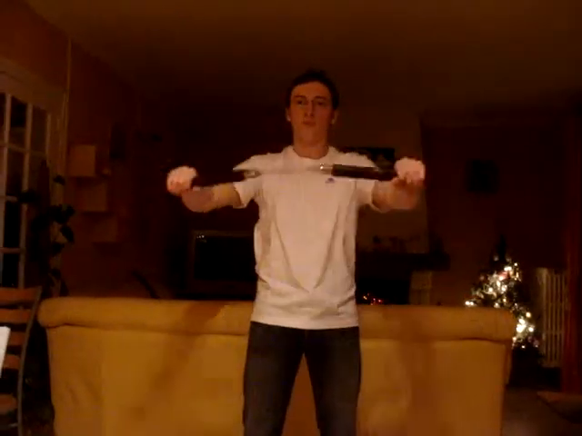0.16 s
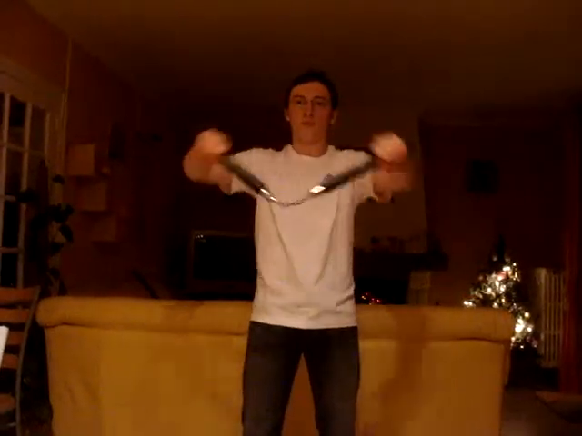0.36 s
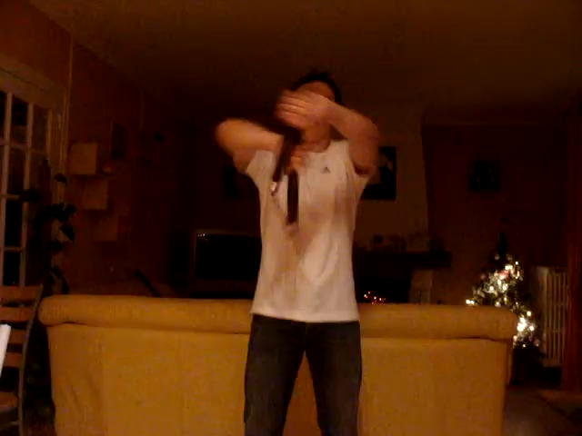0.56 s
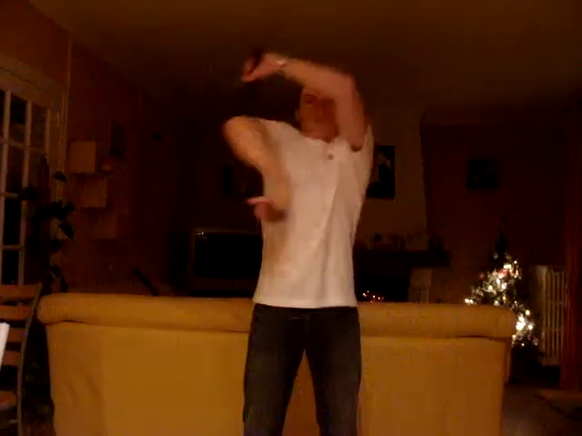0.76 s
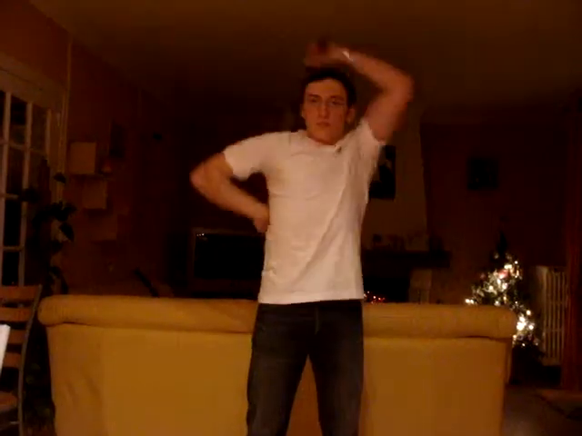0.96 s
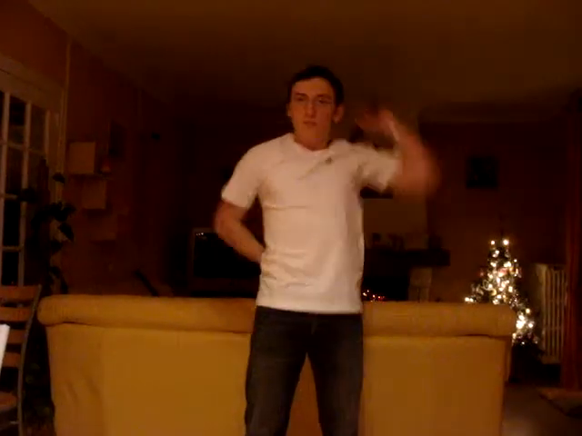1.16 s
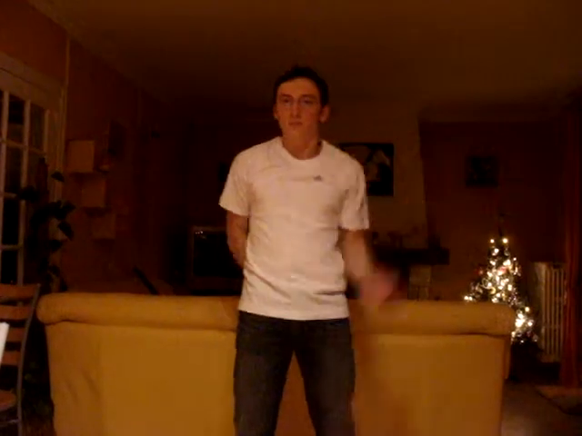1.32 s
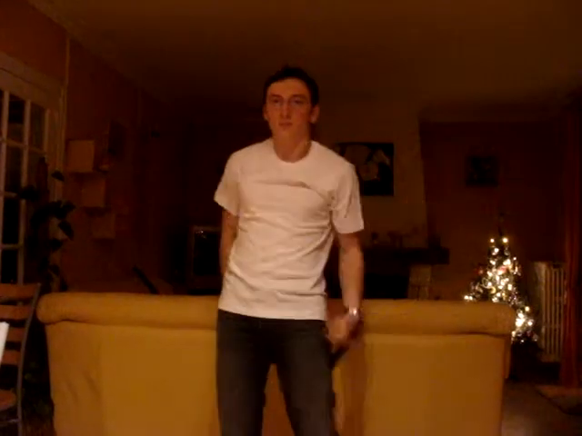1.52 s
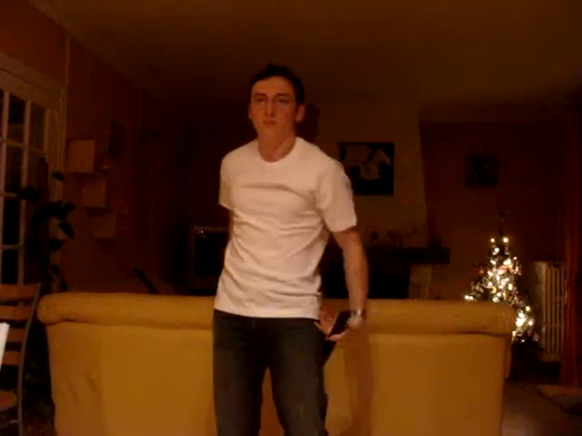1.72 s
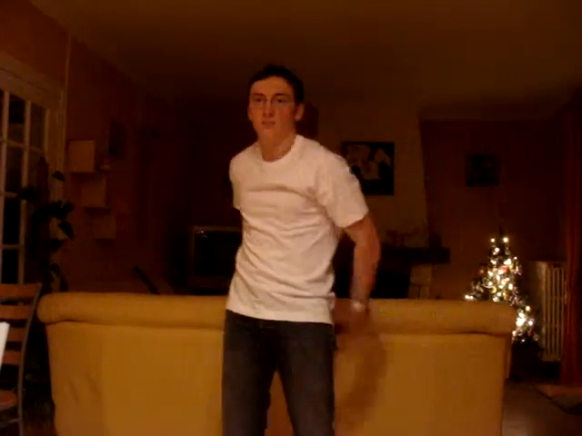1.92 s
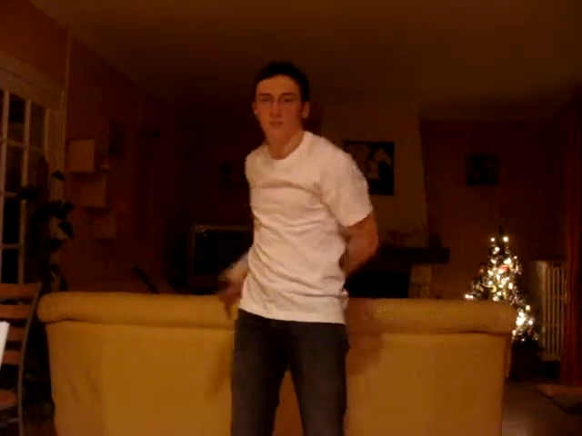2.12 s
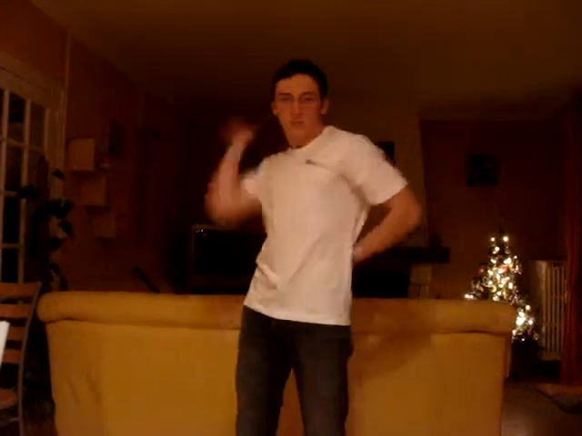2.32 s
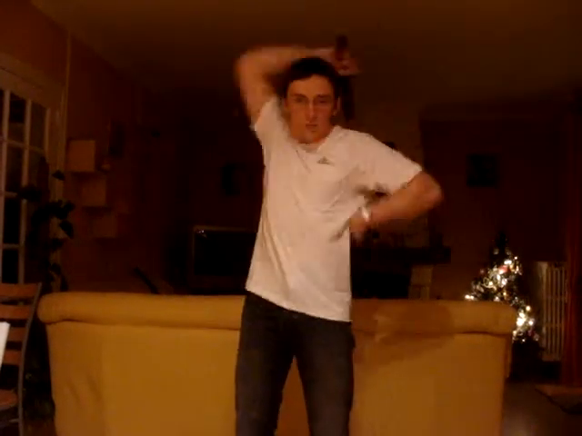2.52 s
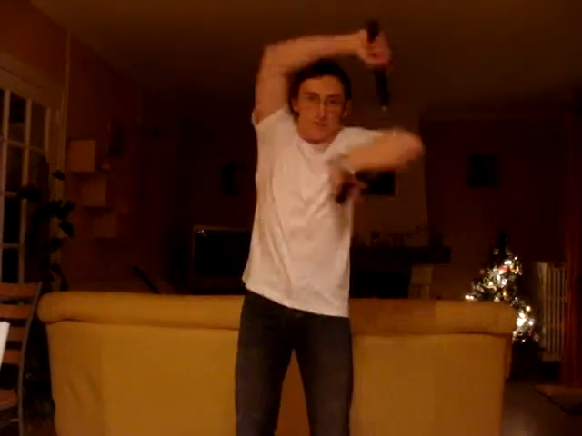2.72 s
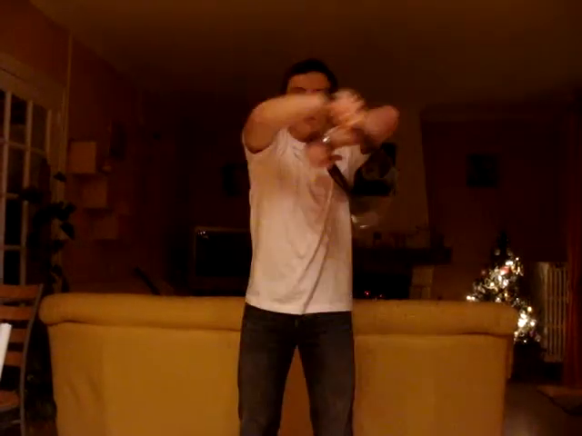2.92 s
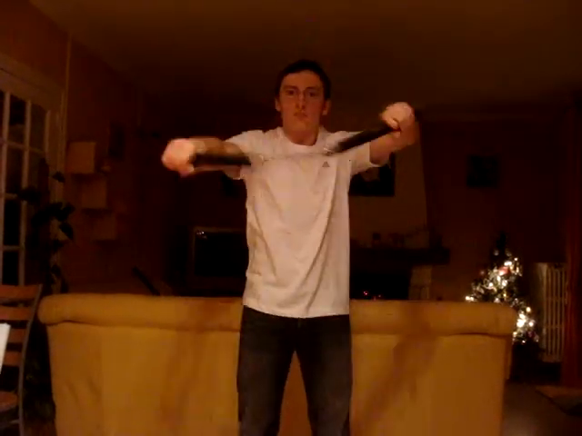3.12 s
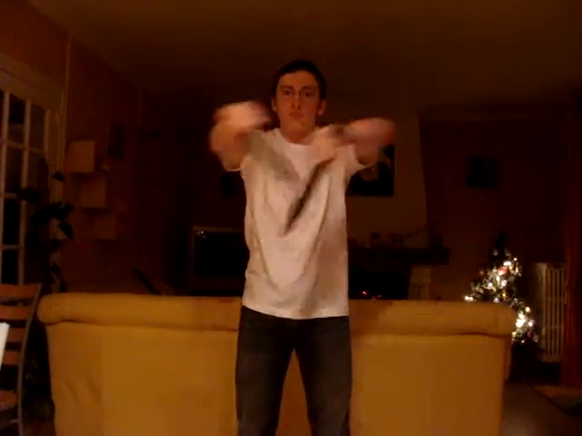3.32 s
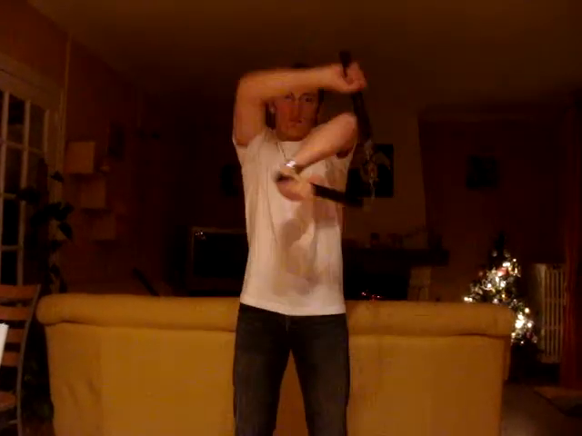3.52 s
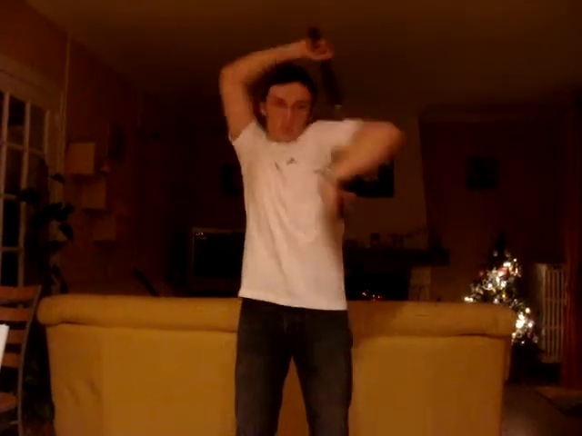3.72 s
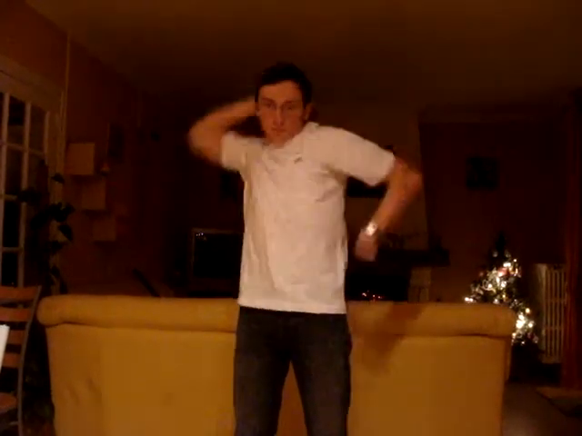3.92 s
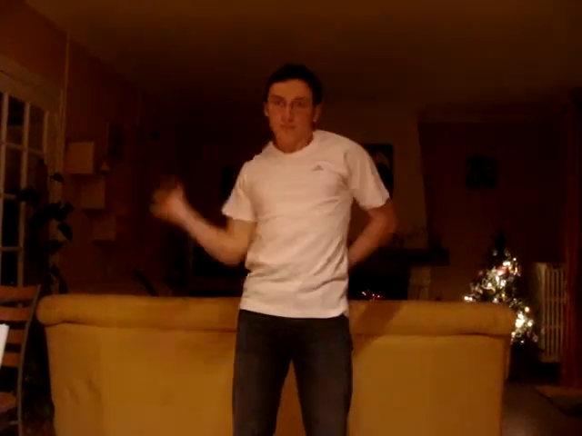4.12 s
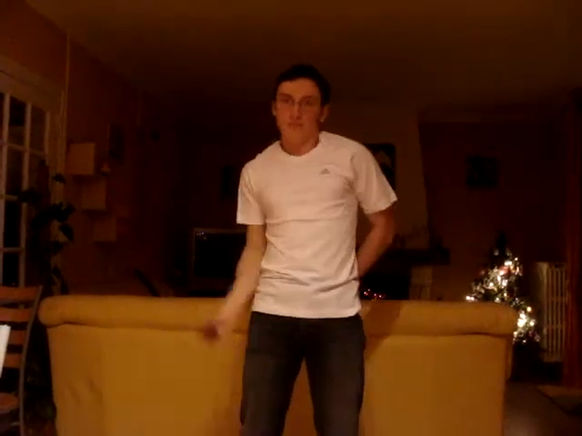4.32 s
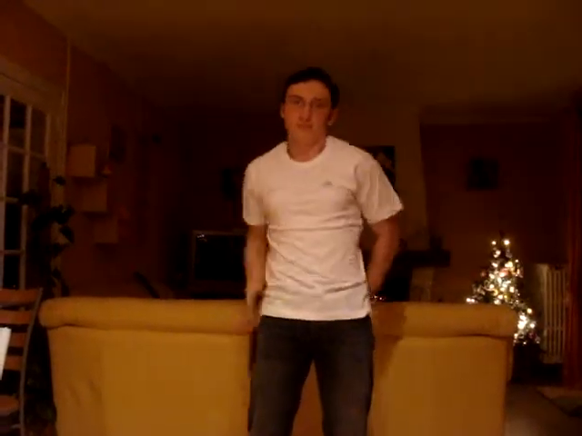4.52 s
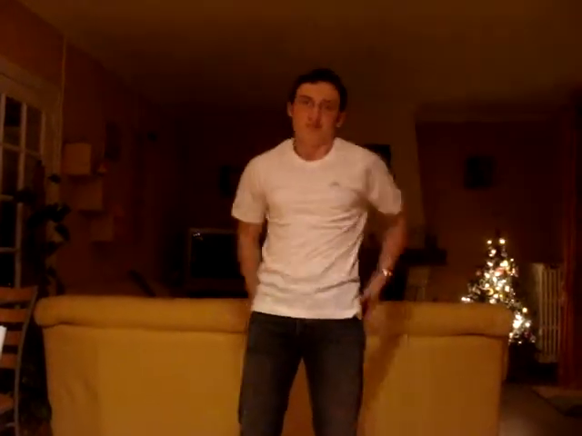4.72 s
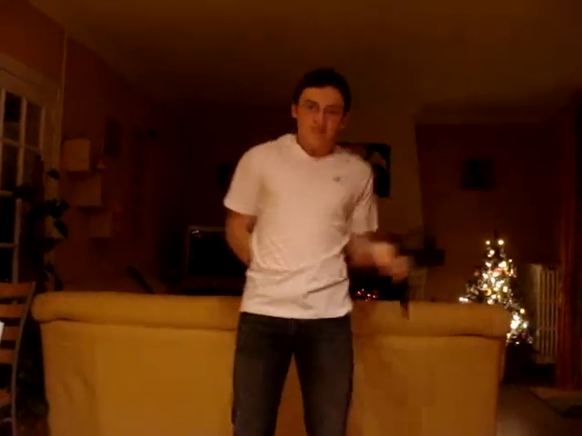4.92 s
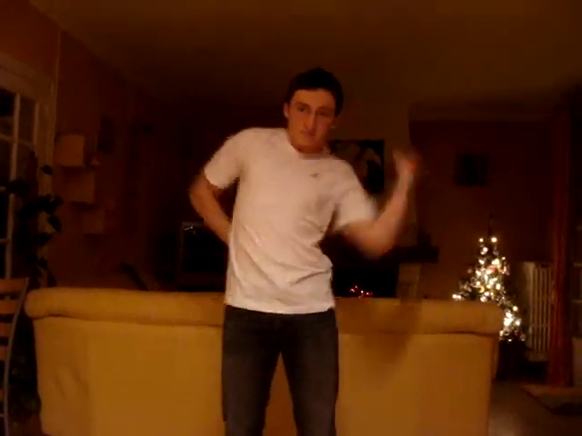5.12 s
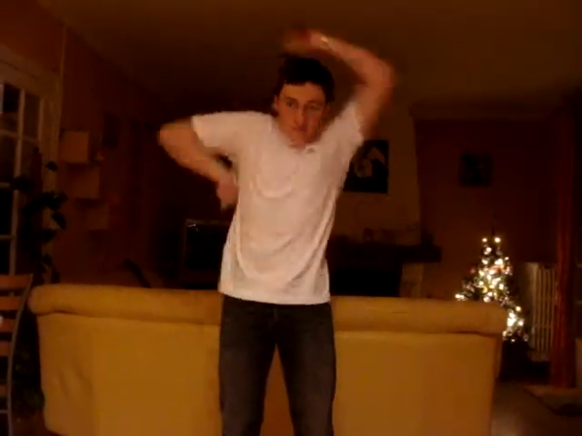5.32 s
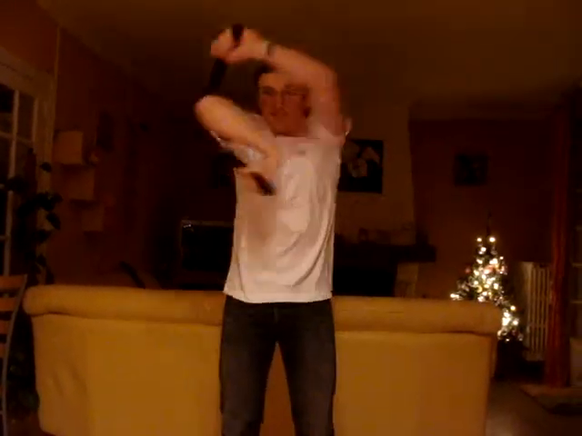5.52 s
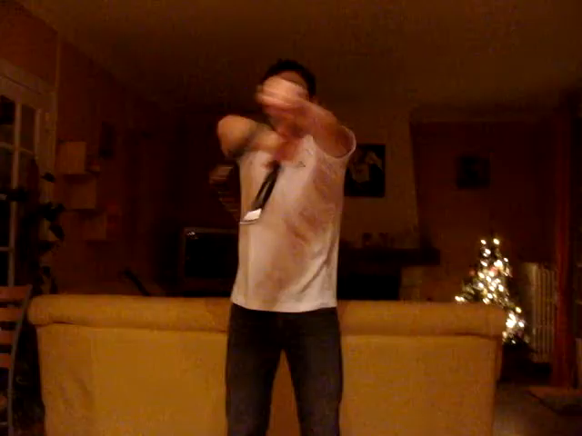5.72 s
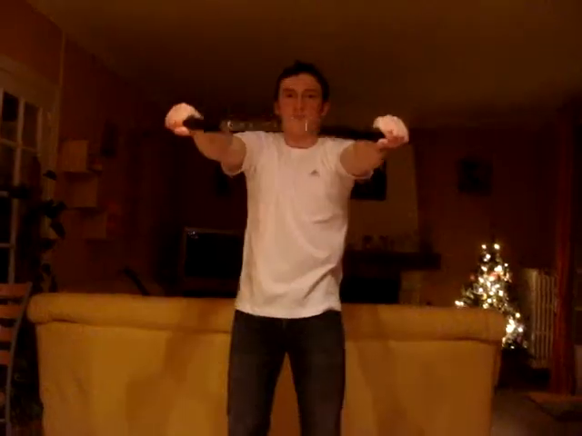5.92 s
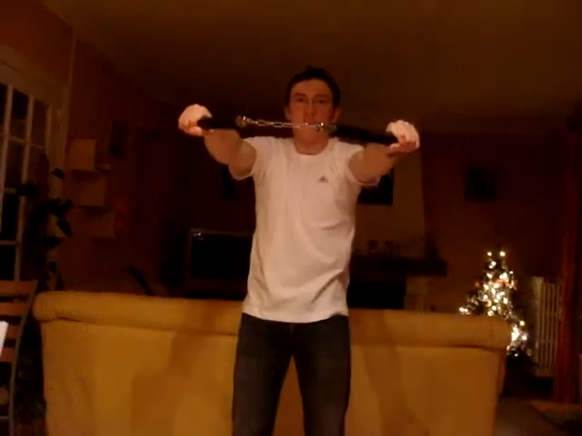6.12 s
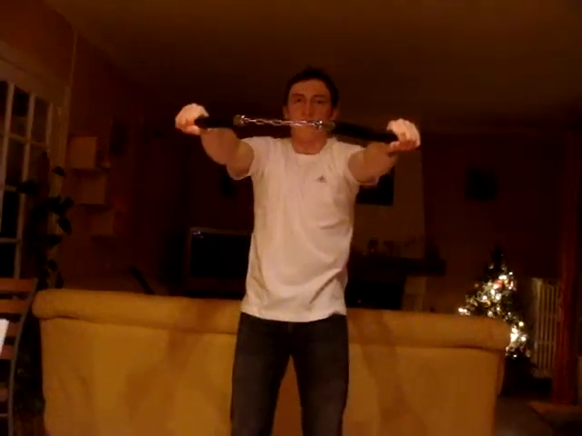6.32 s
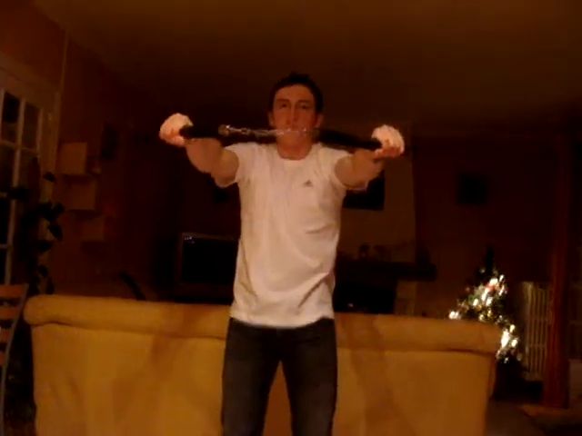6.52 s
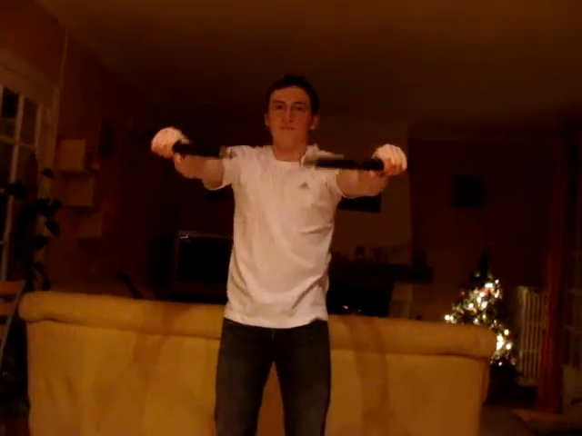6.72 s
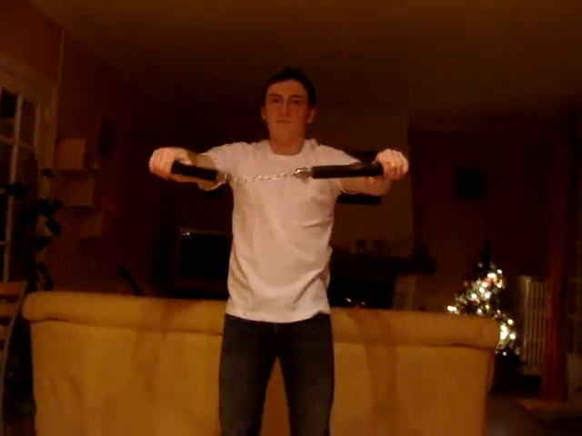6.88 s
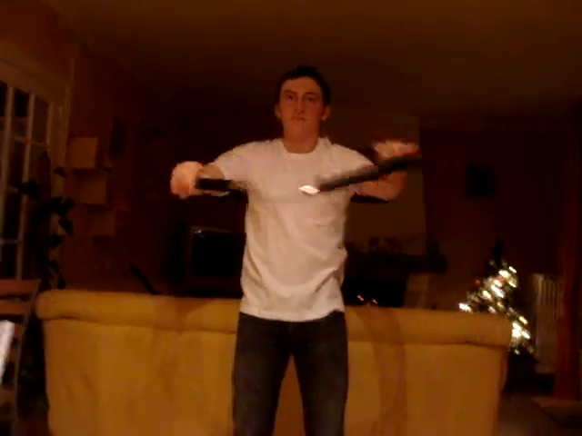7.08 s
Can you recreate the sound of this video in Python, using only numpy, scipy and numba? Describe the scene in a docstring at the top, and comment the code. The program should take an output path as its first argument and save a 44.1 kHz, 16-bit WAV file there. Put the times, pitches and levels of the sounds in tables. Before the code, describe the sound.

In a living room with short reverberation, a small microphone hears quick whooshes and sharp wooden knocks coloured by short metallic link rattles. Softer hollow body slaps and rubbing cloth fill the gaps. Late on, something tiny snaps, scrapes and snaps again very close, dry and loud. One more clack is followed by a pause and a strong blow with rumbling floor resonance, then small chain ticks over steady dull hiss and thin whine.

```python
"""A tug on a short chain, then swishes, rattle and rustle: wooden nunchaku swung in a living room.
Catches, slaps and chain jerks are clusters of random contacts through wood, steel and body filters.
Swishes are gliding band-passed noise; air, rolling chain and clothes are noise and grains that follow the effort.
Echoes and decaying noise bands draw these out; a heavy thud of ringing modes and noise comes near the end.
Two dry clicks with a scrape between them sit at the microphone; floor bumps, hiss and whine lie beneath."""
import sys
import numpy as np
from scipy import signal
from scipy.fft import rfft, irfft
from scipy.io import wavfile
from numba import njit

SR = 44100
rng = np.random.default_rng(int(sys.argv[2]) if len(sys.argv) > 2 else 0)


def pcm_store(signal):
    """Save signal as 16-bit PCM."""
    levels = np.round(np.clip(np.atleast_2d(signal), -1, 1) * 32767)
    wavfile.write(sys.argv[1], SR, levels.astype(np.int16).T)


N = 315315
TIME_S = np.arange(N) / SR


def undb(db):
    """Amplitude ratio of a level in dB."""
    return 10 ** (np.asarray(db) / 20)


def unit(x):
    """Scale to an energy of one."""
    return x / np.sqrt(np.sum(x ** 2) + 1e-18)


def level(x, db):
    """Scale to an rms level."""
    return unit(x) * np.sqrt(len(x)) * undb(db)


def add(out, start_s, x):
    """Mix x into out from start_s on."""
    i = max(int(start_s * SR), 0)
    out[i:i + len(x)] += x[:N - i]


def on_log(hz, points):
    """Read (Hz, value) points on a log-frequency axis."""
    f, value = np.transpose(points)
    return np.interp(np.log(np.maximum(hz, 1)), np.log(f), value)


def colour(x, spectrum, size=4096):
    """Causal minimum-phase filter with the given spectrum, from the folded cepstrum."""
    log_gain = np.log(undb(on_log(np.fft.rfftfreq(size, 1 / SR), spectrum)))
    cepstrum = irfft(log_gain)
    cepstrum[1:size // 2] *= 2
    cepstrum[size // 2 + 1:] = 0
    impulse = irfft(np.exp(rfft(cepstrum)))
    return signal.fftconvolve(x, impulse)[:len(x)]


@njit
def svf(x, hz, width):
    """Band-pass whose centre may move every sample; width is relative to the centre."""
    y, b, l = np.empty(len(x)), 0., 0.
    for i in range(len(x)):
        g = np.tan(np.pi * hz[i] / SR)
        v = (b + g * (x[i] - l)) / (1 + g * (g + width))
        b, l, y[i] = 2 * v - b, l + 2 * g * v, width * v
    return y


def noise(count=N):
    """White noise with an rms of one."""
    return rng.standard_normal(count)


def swell(t, half_s):
    """Bell-shaped rise and fall about t = 0."""
    return np.exp(-(t / half_s) ** 2 / 2)


# hard catches, stick home and chain tight; levels before room, steel before its gain:
# t/s, wood level/dB, steel level/dB, body level/dB, clatter length/s, link ring f/Hz
CATCHES = [ (1.311, -26, -51, -54, 0.0046, 2800), (2.247, -23.5, -41, -34.5, .019, 8400),
           (2.675, -33, -53, -48, .0024, 3600), (3.124, -28, -33.5, -37.5, .017, 7360),
           (3.599, -36, -44.5, -40.5, 0.0022, 3080), (3.776, -27, -36.5, -47, 0.0063, 6830),
           (4.440, -29, -35, -42, 0.014, 3240), (4.592, -32, -36.5, -38.5, 0.013, 7660),
           (5.905, -27, -34, -37, .02, 7030), (6.598, -23, -36.5, -34, 0.0026, 3750),
           (6.615, -35.5, -41, -23.5, .01, 6850)]


def catches(dulling=.87, steel_gain_db=3):
    """Each catch knocks the wood, shakes the steel links into a short ring and slaps the hand."""
    out = np.zeros(N)
    for t_s, wood_db, steel_db, body_db, length_s, link_hz in CATCHES:
        # a stick landing on flesh with little steel in the blow loses its treble
        dull_db_per_oct = dulling * max(wood_db - steel_db - 12, 0)
        add(out, t_s, undb(wood_db) * wood_knock(length_s, dull_db_per_oct))
        add(out, t_s, undb(steel_db + steel_gain_db) * link_ring(length_s, link_hz))
        add(out, t_s, undb(body_db) * body_slap(length_s))
    return out


def first_contact(length_s, firm=0.88, firm_s=0.0093):
    """The shorter a clatter, the firmer its first contact."""
    return firm * np.exp(-length_s / firm_s)


def clatter(length_s, first, ring_s, count=16, size=8192):
    """A first contact and others scattered behind it, each a brief crunch; it builds up if the first is not firm."""
    when = (np.arange(count) + rng.random(count)) * 2 / count  # in clatter lengths
    build = np.minimum(3 * first + (when / 0.42) ** 2, 1)
    energy = rng.exponential(size=count) * np.exp(-when / 0.53) * build
    hits = np.zeros(size)
    np.add.at(hits, np.minimum(when * length_s * SR, size - 1).astype(int), energy)
    ringing_energy = signal.lfilter([1], [1, -np.exp(-2 / (ring_s * SR))], hits)
    burst = unit(np.sqrt(ringing_energy) * noise(size))
    burst[0] += first
    return burst


# wood spectrum, relative: f/Hz, level/dB
WOOD_SPECTRUM = [(60, -44), (300, -24.5), (800, -13), (1300, -8.5), (1800, -5), (2300, -3.5), (2800, -1),
                 (3400, -5), (4200, -9.5), (6000, -18), (10000, -62)]


def wood_knock(length_s, dull_db_per_oct=0, ring_s=0.0015):
    """Clatter of the sticks, losing dull_db_per_oct of treble above 2900 Hz."""
    spectrum = [(hz, db - dull_db_per_oct * max(np.log2(hz / 2900), 0)) for hz, db in WOOD_SPECTRUM]
    return unit(colour(clatter(length_s, first_contact(length_s), ring_s), spectrum))


# steel spectrum, relative: f/Hz, level/dB
STEEL_SPECTRUM = [(1500, -28.5), (3000, 3.5), (4000, 8.5), (5000, 9), (6200, 2.5), (7600, 2.5), (9000, 3.5),
                  (10200, -2.5)]


def link_ring(length_s, hz, ring_db=-3, width=0.076, firm_share=0.34, ring_s=0.00098):
    """Clatter of the steel links, with a short ring at hz."""
    contacts = clatter(length_s, firm_share * first_contact(length_s), ring_s)
    links = colour(contacts, STEEL_SPECTRUM)
    ring = svf(links, np.full(len(links), float(hz)), width)
    return unit(unit(links) + undb(ring_db) * unit(ring))


# soft body spectrum, relative: f/Hz, level/dB
BODY_SPECTRUM = [(40, -43.5), (90, -32.5), (140, -6.5), (250, -2.5), (430, -1), (700, 3), (1200, -7.5),
                 (2200, -1.5), (6000, -58)]


def body_slap(length_s, ring_s=0.006):
    """The dull smack of hand or body."""
    return unit(colour(clatter(length_s, first_contact(length_s), ring_s), BODY_SPECTRUM))


# soft landings on the clothed body, before room: t/s, body level/dB, wood level/dB, clatter length/s
SLAPS = [(1.076, -42.5, -38.5, 0.032), (1.456, -37.5, -38.5, .01), (1.574, -50, -44, 0.013),
         (1.835, -45, -43, 0.012), (2.447, -43.5, -31, 0.034), (2.558, -51, -38, 0.017),
         (3.478, -44, -36.5, 0.012), (3.738, -42.5, -39.5, 0.0036), (4.862, -39, -33.5, .028)]


def slaps(thump_hz=443, thump_width=.6, thump_db=-2.5, dull_db_per_oct=-1):
    """The stick lands on the body with a slack chain: a hollow thump and a knock."""
    out = np.zeros(N)
    for t_s, body_db, wood_db, length_s in SLAPS:
        smack = body_slap(length_s)
        hollow = unit(svf(smack, np.full(len(smack), float(thump_hz)), thump_width))
        add(out, t_s, undb(body_db) * unit(smack + undb(thump_db) * hollow))
        # negative dulling: treble rises 1 dB per octave
        add(out, t_s, undb(wood_db) * wood_knock(length_s, dull_db_per_oct))
    return out


# chain jerks in mid-air, before room, steel before its gain:
# t/s, stick tug level/dB, link level/dB, clatter length/s
JERKS = [(.004, -46, -57, .011), (0.384, -43.5, -56, 0.0041), (0.465, -43, -43.5, 0.011),
         (0.715, -50, -71, 0.01), (0.83, -45, -60, 0.0095), (1.954, -49, -47.5, 0.022),
         (2.852, -42, -55, .0017), (2.867, -37.5, -62, .022), (2.929, -39, -54, 0.0057),
         (3.102, -39.5, -72, 0.0089), (3.245, -42, -44, .03), (3.347, -41.5, -46.5, 0.012),
         (4.095, -36.5, -46.5, 0.025), (4.733, -35, -40, 0.027), (5.465, -42.5, -55, 0.0012),
         (6.884, -46.5, -50.5, 0.0015), (6.998, -47.5, -58, .02), (7.062, -48.5, -50.5, 0.022)]


def jerks(steel_gain_db=3, link_hz=5800, scatter=0.23):
    """The chain takes up its slack and tugs at the sticks; a different link rings each time."""
    out = np.zeros(N)
    for t_s, wood_db, steel_db, length_s in JERKS:
        hz = link_hz * np.exp(scatter * rng.standard_normal())
        tug = undb(wood_db) * wood_knock(length_s)
        links = undb(steel_db + steel_gain_db) * link_ring(length_s, hz)
        add(out, t_s, tug + links)
    return out


# fast passes of the free stick, before room and speed swell; each peaks 15 ms before t:
# t/s, level/dB, air pitch f/Hz
SWISHES = [(.145, -47.5, 1570), (.915, -42, 1504), (1.214, -39, 1488), (2.48, -40.5, 1210),
           (3.154, -38.5, 1206), (3.455, -38, 1398), (3.768, -42.5, 1063), (3.89, -43.5, 383.6),
           (4.72, -53, 1400)]


def swishes(width=0.99, glide=0.21, ref_half_s=.031, ref_hz=1390, stretch=.8):
    """Eddies shed by the stick: louder and higher as it speeds up; lower passes last longer."""
    out = np.zeros(N)
    for t_s, db, hz in SWISHES:
        half_s = ref_half_s * (ref_hz / hz) ** stretch
        t = np.arange(-3 * half_s, 3 * half_s, 1 / SR)
        speed = swell(t, half_s)
        centre_hz = hz * np.clip(1 - glide + glide * speed, .1, 2)
        rush = svf(noise(len(t)), centre_hz, 2 * width)
        rush = svf(rush, centre_hz, 2 * width)
        add(out, t_s - .015 + t[0], level(rush, db) * speed)
    return out


def grains(rate_hz, spread_db):
    """Random tiny contacts, a few much stronger than the rest."""
    strength = undb(spread_db * np.minimum(rng.exponential(size=N), 4))
    return (rng.random(N) < rate_hz / SR) * strength * rng.choice([-1, 1], N)


# vigour of the swinging, relative: t/s, level/dB
EFFORT = [(0.0, -41), (0.21, -53.5), (0.44, -52), (0.59, -42.5), (1.14, -45), (1.26, -41.5), (2.23, -43.5),
          (2.44, -43.5), (2.84, -46), (4.02, -41), (4.28, -43.5), (4.49, -43.5), (4.61, -39), (4.81, -40.5),
          (4.95, -42), (5.98, -44), (6.16, -60), (6.3, -52)]
# shirt rub as an arm reaches over the shoulder, before room: t/s, level/dB, half length/s
REACHES = [(1.2, -51.5, 0.21), (2.534, -46, 0.16), (2.916, -51, 0.075), (5.224, -49.5, .04),
           (5.404, -44.5, 0.047)]
# stirred air spectrum, relative: f/Hz, level/dB
AIR_SPECTRUM = [(25, -24), (70, -9.5), (130, -10.5), (230, 0), (450, -2.5), (800, -2), (1300, -4.5),
                (2200, 0), (5000, -21.5)]
# rubbing cloth spectrum, relative: f/Hz, level/dB
CLOTH_SPECTRUM = [(800, -14.5), (2500, -18.5), (4500, 5), (6500, 4.5), (8500, 5.5), (10200, -4)]


def motion(air_db=-51, chain_db=-46.5, cloth_db=-54.5, air_law=0.83, chain_law=1.67, cloth_law=1.8):
    """Stirred air, rolling links and rubbing cloth grow as powers of the effort; a reach adds rustle."""
    effort = undb(np.interp(TIME_S, *np.transpose(EFFORT)))
    air = level(colour(noise(), AIR_SPECTRUM) * effort ** air_law, air_db)
    rolling = colour(grains(rate_hz=1100, spread_db=3.5), WOOD_SPECTRUM)
    chain = level(rolling * effort ** chain_law, chain_db)
    rub = level(effort ** cloth_law, cloth_db)
    for t_s, db, half_s in REACHES:
        rub = rub + undb(db) * swell(TIME_S - t_s, half_s)
    cloth = level(colour(grains(rate_hz=4100, spread_db=4.0), CLOTH_SPECTRUM), 0)
    return air + chain + rub * cloth


# ringing modes of floor and room, relative: f/Hz, level/dB, t60/s
THUD_MODES = [(43.5, -19, 0.4), (67, -5, 0.23), (124.2, 0.5, 0.37), (155, -11, 0.34), (238.6, -9.5, 0.61),
              (243, -11, 0.26), (298, -19, 0.92), (439, -6, 0.45), (623, -4.5, 0.2)]
# dull weight of the thud, relative: f/Hz, level/dB
HEFT_SPECTRUM = [(25, -30), (45, -7), (70, -9), (95, -4), (125, 6), (240, 5), (400, -5), (900, -21),
                 (3000, -51)]


def thud(start_s=6.600, build_s=0.00143, ring_db=-16.5, heft_db=-22, heft_t60_s=0.55):
    """A heavy blow: a dull rumble in which the low modes of floor and room ring on."""
    out, t = np.zeros(N), TIME_S[:SR]
    ring = 0
    for hz, db, t60_s in THUD_MODES:
        tone = np.sin(2 * np.pi * (hz * t + rng.random()))
        ring = ring + undb(db) * tone * undb(-60 * t / t60_s)
    heft = level(colour(noise(SR), HEFT_SPECTRUM), heft_db) * undb(-60 * t / heft_t60_s)
    add(out, start_s, (undb(ring_db) * ring + heft) * (1 - np.exp(-t / build_s)))
    return out


# clicks at the microphone: t/s, ring peak level/dB, f/Hz, t60/s
CLICKS = [(5.5089, -2, 2750, 0.0039), (5.5109, -15, 3220, 0.013), (5.5127, -18, 2570, 0.0093),
          (5.6158, -22, 4600, 0.004), (5.615, -7, 1770, 0.0046), (5.6167, -27, 1283, 0.079),
          (5.621, -19.5, 1870, 0.0078)]
# scrape envelope: t/s, level/dB
SCRAPE = [(5.552, -48), (5.564, -31.5), (5.579, -32.5), (5.597, -25), (5.599, -58)]
# scrape resonances, relative level: f/Hz, width/Hz, level/dB
SCRAPE_MODES = [(1010, 460, 1), (1680, 240, 3.5), (2720, 990, 2), (5050, 610, 4.5), (7520, 570, 5.5),
                (9800, 1400, -12)]


def close_clicks(rise_s=0.00013, snap_db=-19, snap_s=0.0033, knock_db=-21, knock_s=0.0076):
    """Something small snaps, scrapes and snaps again at the microphone, too near for the room to answer."""
    out, t = np.zeros(N), TIME_S[:SR // 10]
    for t_s, db, hz, t60_s in CLICKS:
        ring = np.sin(2 * np.pi * hz * t) * undb(-60 * t / t60_s) * (1 - np.exp(-t / rise_s))
        snap = undb(snap_db) * noise(len(t)) * np.exp(-t / snap_s)
        knock = level(colour(noise(len(t)), BODY_SPECTRUM), knock_db) * np.exp(-t / knock_s)
        add(out, t_s, undb(db) * (ring / np.abs(ring).max() + snap + knock))
    scrape = 0
    for hz, width_hz, mode_db in SCRAPE_MODES:
        centre_hz = np.full(len(t), float(hz))
        mode = svf(noise(len(t)), centre_hz, 2 * width_hz / hz)
        scrape = scrape + undb(mode_db) * svf(mode, centre_hz, 2 * width_hz / hz)
    t_s, db = np.transpose(SCRAPE)
    envelope = undb(np.interp(t_s[0] + t, t_s, db, right=-np.inf))
    add(out, t_s[0], level(scrape, 0) * envelope)
    return out


# dull bumps and shifts of weight on the floor: t/s, level/dB, half length/s
BUMPS = [(4.176, -55, 0.12), (4.6, -54, 0.022), (5.271, -44, 0.0098), (5.505, -36.5, 0.0056),
         (7.074, -49.5, 0.007)]
# floor spectrum, relative: f/Hz, level/dB
FLOOR_SPECTRUM = [(25, -32), (45, -4), (85, 0), (130, -8), (250, -4.5), (600, -24), (2000, -47)]


def bumps():
    """Low swells of noise that reach the camera through the floor."""
    envelope = sum(undb(db) * swell(TIME_S - t_s, half_s) for t_s, db, half_s in BUMPS)
    return level(colour(noise(), FLOOR_SPECTRUM), 0) * envelope


# reverberation time: f/Hz, t60/s
ROOM_T60 = [(100, 0.37), (400, 0.78), (1200, 0.49), (2800, 0.6), (5000, 0.62), (9000, 0.55)]


def room(x, direct_db=-3.5, early_db=-11, tail_db=-2.0, build_s=0.0017, count=6):
    """Direct sound and a few wall echoes; the diffuse field stores each band's energy and lets it die away."""
    out = undb(direct_db) * x
    for lag_s in rng.uniform(.003, .025, count):
        add(out, lag_s, undb(early_db) / np.sqrt(count) * rng.choice([-1, 1]) * x)
    edges_hz = np.geomspace(440, 11000, 25) - 400
    for lo, hi in zip(edges_hz, edges_hz[1:]):
        band = signal.butter(3, [lo, hi], "band", fs=SR, output="sos")
        energy = signal.sosfilt(band, x + 1e-18) ** 2 + 1e-18
        decay_s = on_log(np.sqrt(lo * hi), ROOM_T60) / np.log(10 ** 6)
        for tau_s in (build_s, decay_s):
            keep = np.exp(-1 / (tau_s * SR))
            energy = signal.lfilter([1 - keep], [1, -keep], energy)
        out += np.sqrt(energy) * level(signal.sosfilt(band, noise()), tail_db)
    return out


# hiss spectrum, relative: f/Hz, level/dB
HISS_SPECTRUM = [(18, -46), (30, -45), (87, -12.5), (120, -10.5), (358, -10), (435, -8), (1090, -11),
                 (1240, -10.5), (1360, -10), (4170, -22), (4940, -25), (10000, -30), (13000, -66),
                 (22000, -120)]
# faint electronic whine: f/Hz, rms level/dB
WHINE = [(1217, -63), (2439, -68), (4829, -73)]


def background(hiss_db=-51.7):
    """Steady filtered noise and a thin whine of sines."""
    whine = sum(np.sqrt(2) * undb(db) * np.sin(2 * np.pi * hz * TIME_S) for hz, db in WHINE)
    return level(colour(noise(), HISS_SPECTRUM), hiss_db) + whine


def scene(blow_s=0.048):
    """One microphone feeds both channels; the level of a blow is its energy spread over blow_s."""
    blows = (catches() + slaps() + jerks()) * np.sqrt(blow_s * SR)
    in_room = room(blows + swishes() + motion())
    mono = in_room + thud() + close_clicks() + bumps() + background()
    return np.array([mono, mono])


def record(dry, low_cut_hz=33, top_hz=10120):
    """The small microphone drops the deepest bass; the camera cuts the top steeply."""
    low_cut = signal.butter(4, low_cut_hz, "high", fs=SR, output="sos")
    top_cut = signal.ellip(12, .2, 70, top_hz, fs=SR, output="sos")
    return signal.sosfilt(top_cut, signal.sosfilt(low_cut, dry))


dry = scene()
out = record(dry)
pcm_store(out)
```